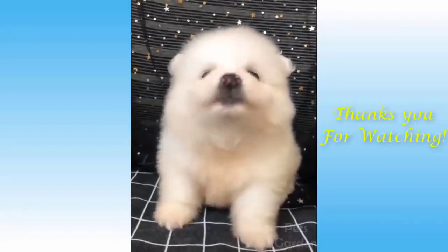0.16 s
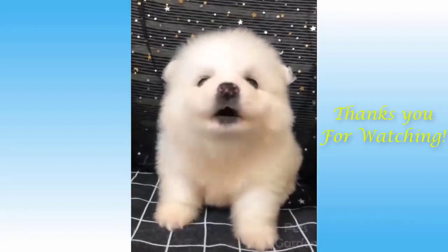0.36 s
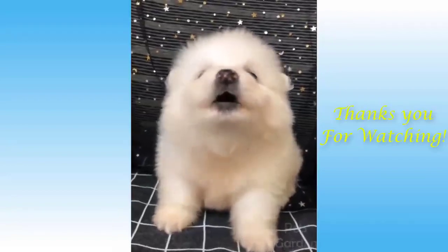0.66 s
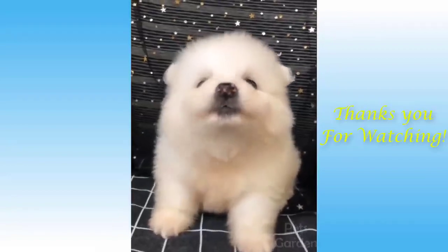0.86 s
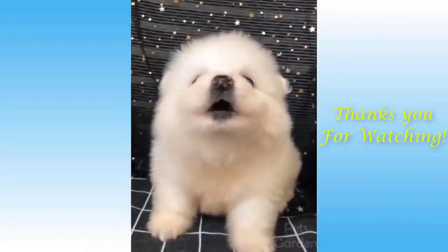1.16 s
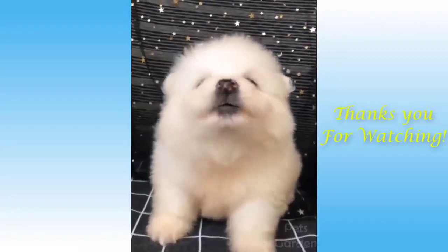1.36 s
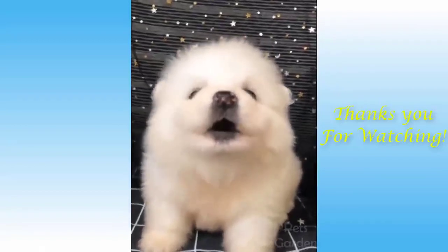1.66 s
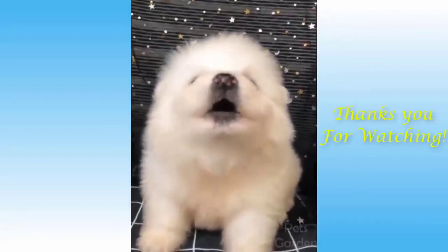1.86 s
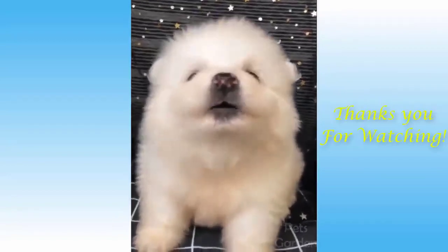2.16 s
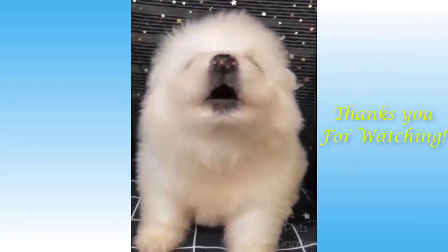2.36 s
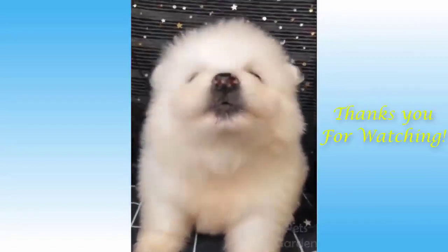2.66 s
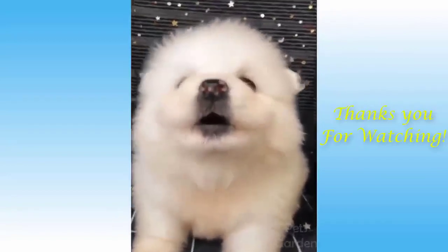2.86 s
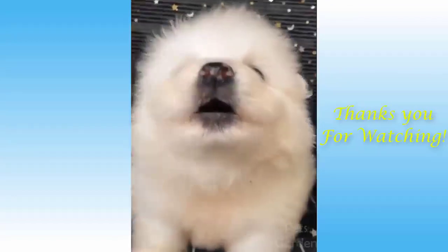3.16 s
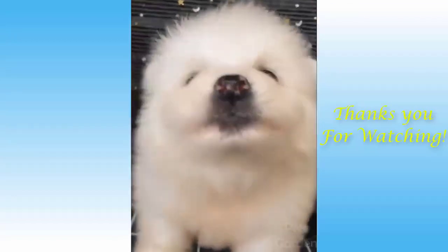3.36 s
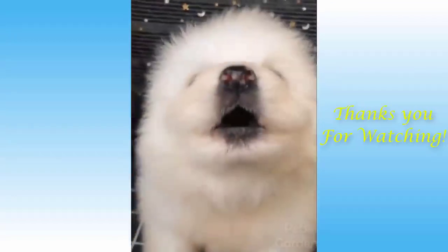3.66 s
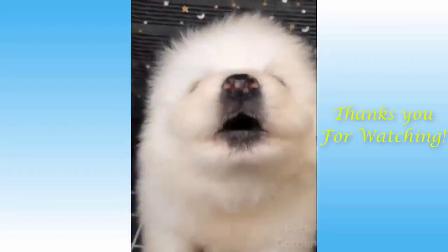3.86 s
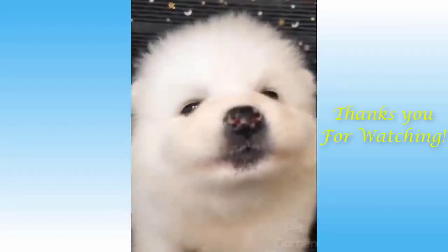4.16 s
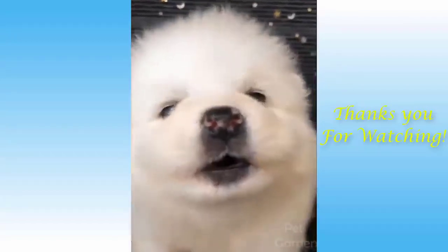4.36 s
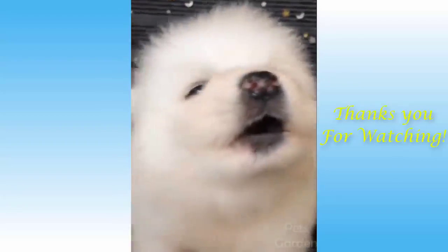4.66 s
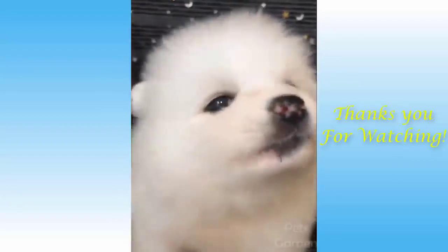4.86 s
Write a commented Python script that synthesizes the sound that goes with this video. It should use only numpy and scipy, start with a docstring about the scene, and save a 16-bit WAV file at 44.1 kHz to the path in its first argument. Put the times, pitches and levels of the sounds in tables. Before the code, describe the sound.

A small puppy gives eight short, high, clear howls close by, each yelping upward at the end, with rattly in-breaths between them.

```python
"""A puppy howls eight short cries, close by in a quiet furnished room.
Each cry is a clean high stack of partials: most dip and rise as the mouth opens, then break at the end.
Clicks ringing the throat make the in-breaths rattle, with hiss and a low puff; narrow noise bands wheeze.
Late on, the voice flutters in quick throbs of tone. Dull echoes, shaped room noise and the wavering
harmonics of a far motor lie underneath."""
import sys
import numpy as np
from scipy import signal
from scipy.fft import rfft, irfft, next_fast_len
from scipy.io import wavfile
from scipy.ndimage import uniform_filter1d

SR = 44100
rng = np.random.default_rng(int(sys.argv[2]) if len(sys.argv) > 2 else 0)


def dump(signal):
    """Clip the signal to [-1, 1] and save it as 16-bit WAV at the path in sys.argv[1]."""
    limited = np.clip(np.atleast_2d(signal).T, -1, 1)
    pcm = np.round(limited * 32767).astype(np.int16)
    wavfile.write(sys.argv[1], SR, pcm)


N = 221105
CUTOFF_HZ = 16300

# path of each howl: time_s, pitch_hz, level_db, mouth_opening (0-1), upper_mouth_hz, upper_partials_db
HOWLS = [
    [(0.0, 900, -17, 0.73, 3450, -45), (0.012, 927.5, -14.5, 1.0, 3490, -46.5),
     (0.064, 920, -12.9, 1.0, 3475, -46.5), (0.104, 907, -15.5, 0.99, 3457, -46),
     (0.14, 884.6, -20, 0.86, 3410, -52), (0.164, 873, -23.5, 0.65, 3320, -58),
     (0.172, 885, -21.5, 0.8, 3330.0, -58.0)],
    [(0.398, 771, -42.5, 0.39, 3640.0, -71.0), (0.43, 746, -43, 0.03, 4020, -63),
     (0.466, 628, -37, 0.3, 3700, -71), (0.518, 595, -38, 0.26, 3570.0, -61),
     (0.566, 627, -29.5, 0.5, 3750, -52), (0.586, 658, -26.9, 0.6, 3680, -45),
     (0.598, 661, -25, 0.8, 3160, -47.5), (0.634, 712.4, -22.5, 0.98, 3500, -47),
     (0.666, 813, -23, 0.87, 3600, -52), (0.698, 889, -20, 0.71, 3920, -52.5),
     (0.726, 940.4, -15.5, 1.0, 3500.0, -50), (0.774, 933.7, -13.5, 1.0, 3530, -45.0),
     (0.802, 920.4, -13.4, 1.0, 3530, -44.5), (0.846, 877, -20, 0.86, 3345, -56),
     (0.878, 855, -24.5, 0.72, 3200, -62)],
    [(1.101, 745, -43, 0.46, 3600, -62), (1.105, 678, -40.5, 0.44, 3610.0, -68),
     (1.145, 725, -41.5, 0.23, 4100, -62), (1.173, 639, -35.5, 0.33, 3730, -70),
     (1.189, 624, -34.5, 0.38, 3660, -61), (1.229, 618, -32.5, 0.4, 3680, -58),
     (1.277, 689, -27.5, 0.78, 3100, -42.5), (1.309, 728.5, -22.5, 0.99, 3624, -50),
     (1.345, 759, -22, 0.98, 3610, -47.5), (1.378, 814, -21.5, 0.81, 3480, -55),
     (1.404, 867.6, -20, 0.78, 3550, -54), (1.437, 841, -17.5, 0.98, 3230, -55),
     (1.486, 801, -23.5, 0.91, 2980, -69)],
    [(1.696, 897, -33, 0.37, 3080.0, -67.0), (1.704, 830, -36, 0.42, 3100, -56),
     (1.736, 927, -25.5, 0.37, 3330, -50.0), (1.768, 744, -35.5, 0.55, 4070, -56),
     (1.796, 750, -34.5, 0.52, 4100, -51.5), (1.828, 674.5, -26, 0.79, 3180, -46),
     (1.9, 751, -24, 0.93, 3600, -54), (1.94, 879, -19.5, 0.67, 3680, -52),
     (1.972, 969.6, -14, 0.97, 3560, -35), (2.024, 948, -15.0, 0.94, 3570, -39.5),
     (2.071, 937, -21, 0.85, 3430, -51.5), (2.1, 973, -22.5, 0.69, 3430.0, -47.5)],
    [(2.344, 1039, -26.8, 0, 3540, -58), (2.36, 1025, -23, 0, 3730, -56.0),
     (2.384, 1016, -23, 0.39, 3650, -54), (2.415, 901, -25, 0.33, 3580.0, -56),
     (2.448, 798, -29, 0.29, 3580, -51.5), (2.488, 768.5, -28, 0.7, 3800, -44.5),
     (2.52, 838, -19.5, 0.82, 3460, -49), (2.56, 891.0, -18.0, 0.67, 3800, -48),
     (2.58, 902, -15, 0.83, 3240, -51), (2.616, 893, -16.5, 0.79, 3280, -48.0),
     (2.664, 923, -21.2, 0.65, 3280, -63), (2.7, 947, -22.5, 0.65, 3150.0, -68)],
    [(2.932, 1021, -28.5, 0.0, 3150.0, -61), (2.964, 1020, -26, 0.0, 3340, -58),
     (3.016, 962, -25.8, 0.07, 3330.0, -52.5), (3.04, 849.0, -25.3, 0.12, 3500.0, -50),
     (3.06, 762, -30.5, 0.28, 3360.0, -55.5), (3.092, 754, -27.5, 0.68, 3300, -57.0),
     (3.108, 783, -23.5, 0.78, 3360.0, -55.5), (3.128, 812, -21.5, 0.71, 3530, -58),
     (3.16, 870, -18.5, 0.59, 3690, -46), (3.212, 903, -15, 0.77, 3190, -51),
     (3.29, 937, -21, 0.65, 3210, -60.5), (3.338, 948, -24, 0.55, 3160, -66.0)],
    [(3.571, 859, -27, 0.0, 3220.0, -68.0), (3.595, 894.0, -26, 0.0, 3330.0, -63),
     (3.615, 926, -23.5, 0.08, 3430.0, -56.0), (3.627, 882, -23.5, 0.0, 3280, -52.5),
     (3.679, 693.5, -32, 0.24, 3220.0, -54.5), (3.731, 696.6, -28, 0.35, 3150.0, -52),
     (3.755, 703.6, -23, 0.7, 3230, -49.0), (3.819, 778, -19.5, 0.79, 3250, -56),
     (3.875, 880, -14.0, 0.74, 3170, -44.5), (3.93, 904, -15.5, 0.68, 3230, -52),
     (3.959, 913, -17.5, 0.66, 3230, -58), (3.982, 963, -18.5, 0.63, 3360.0, -51)],
    [(4.317, 833, -28.5, 0.0, 3430.0, -69.0), (4.325, 798, -32.5, 0, 3400, -65.0),
     (4.361, 844, -24.5, 0, 3360, -56), (4.409, 730, -30.5, 0.07, 3330.0, -59.5),
     (4.461, 678, -30.5, 0.27, 3180.0, -54), (4.505, 691.4, -28, 0.26, 3170, -49),
     (4.565, 736.3, -23, 0.67, 3160, -49.5), (4.62, 766.3, -19.5, 0.69, 3310, -45),
     (4.653, 792, -18.9, 0.76, 3310, -52.5), (4.705, 879, -14.5, 0.63, 3690, -44.5),
     (4.729, 864.0, -15.0, 0.65, 3610.0, -43), (4.821, 884, -12, 0.72, 3415, -45.5),
     (4.877, 849.7, -15, 0.74, 3320, -52), (4.91, 828, -18.5, 0.74, 3330.0, -52)],
]
# the break ending each howl, a swell, a flip, a step to a second note, a drop:
# top_s, top_hz, top_db, hold_s, second_note_hz, second_note_db, second_note_s, overtones_db, swell_db
BREAKS = [(.187, 1132, -26.5, .001, 1030, -31.5, 0.00084, -39.5, 3.5),
          (.894, 1070, -25.5, 0.0021, 970, -31.5, 0.00076, -40, 7.5),
          (1.503, 1000, -26.5, 0.00082, 930, -34, 0.00081, -38, 6.5),
          (2.116, 1336, -9.5, 0.022, 1054, -26.5, 0.0012, -35, 1),
          (2.719, 1295, -12.5, 0.013, 1006, -25.5, 0.0016, -36, -3),
          (3.354, 1307, -13, 0.0025, 1065, -21.5, .017, -32.5, 6),
          (3.991, 1036, -23, 0.0014, 1111, -21, 0.12, -35, -4),
          (4.929, 960, -22, 0.00081, 980, -22, .011, -36, -3.5)]
# colour of the first five partials, mouth nearly shut and wide open: frequency_hz, level_db
SHUT_COLOUR = [(580.0, -2.5), (750.0, -2.3), (950.0, 2.5), (1250.0, -13.5), (1500.0, -17.5),
               (1800.0, -10.5), (2100.0, -19), (2400.0, -43.5), (2750.0, -55), (3100.0, -46),
               (3500.0, -52.5), (3800.0, -48.5), (4200.0, -43), (4700.0, -33.5), (5300.0, -52.5)]
OPEN_COLOUR = [(580.0, -9.5), (750.0, -0.3), (950.0, 0.5), (1250.0, 10.5), (1500.0, 12), (1800.0, 19.5),
               (2100.0, 12), (2400.0, 14.5), (2750.0, -6.5), (3100.0, 9.5), (3500.0, 12.5), (3800.0, -8.5),
               (4200.0, -26), (4700.0, -21.5), (5300.0, -43.5)]
COLOUR_AT_HZ = 3500   # upper mouth resonance at which both colours hold
# extra loss of partials 1 to 5 per dB the howl sinks below its loudest so far: loss_db_per_db
TIRING = (0.0, 0.065, 0.59, 0.14, 1.0)
# colour of the overtones in a break: frequency_hz, level_db
BREAK_COLOUR = [(1600, 3), (2050, 0.5), (2600, -8), (2950, -10.5), (3250, -1), (3650, -15), (4200, -26.5),
                (5000, -35.5)]
# mouth colour of the partials from the sixth up: frequency_hz, level_db
UPPER_COLOUR = [(2290, -40.5), (3900, -3.5), (4710, -20), (5620, -17), (6480, -1.5), (7000, -1.5),
                (7780, -3), (8810, -24), (9980, -20), (11000, -36.5), (11800, -28), (15000, -34),
                (16000, -78.5)]
# colour of the rough partials: frequency_hz, level_db
RASP_COLOUR = [(3900, -21.5), (4700, -11.5), (5500, -15.5), (6300, -5), (7300, -5.5), (8500, -7),
               (10000, -23.5)]
# colour of the topmost partials: frequency_hz, level_db
SHEEN_COLOUR = [(8500, -25.5), (9500, 1), (10700, -9.5), (12000, -2), (13000, -8), (13900, 1), (15200, -11)]
# bands of air hissing at the lips: frequency_hz, width_hz, level_db
LIP_BANDS = [(9200, 630, 4), (12400, 1000, -2.5), (13900, 1700, -5), (14900, 400, -3)]
# levels for a howl at 0 dB, and the share of the howl's level swing they follow
RASP_DB, RASP_FOLLOWS = -53, 0.34
HISS_DB, HISS_FOLLOWS = -54.0, 0.6
HISS_OPEN_DB, BREAK_HISS_DB = 6.0, 5.5   # more hiss with the mouth wide open, more air in a break
# from about this pitch (lower once the flip begins) the folds lock to the throat and the overtones tear
TEAR_HZ = 1183
# timing of a break, then the pitch ratio and level gained before the flip's fast last part
SWELL_S, FLIP_S, FLIP_LAST_S, EARLY_RATIO, EARLY_DB = 0.0051, 0.012, .004, 1.1, 5.5
HOLD_SAG_DB_PER_S, STEP_S, UNDERSHOOT = 394.5, 0.0038, 0.94   # the second note starts flat and climbs
DROP_S, DROP_RATIO, DROP_DB, FADE_S, FADE_DB = .006, 0.792, -3.5, .005, -20
BREAK_TOP_DB = -61.5   # upper partials in a break

# colour of the room noise: frequency_hz, relative_level_db_per_hz
ROOM_COLOUR = [(24, -37), (40, 0.5), (269, -4), (412, -7.5), (542, -8.5), (790, -9.5), (1180, -7.5),
               (1410, -10), (2150, -16.5), (3650, -22.5), (4030, -24), (6330, -25.5), (14500, -29.5),
               (16000, -46)]
ROOM_DB, ROOM_T60_S, ECHO_DB = -55.5, 0.23, -30
WALL_CUT_HZ = 3600   # here the reverb time has shrunk by a factor of 1.4
# harmonics of the motor: frequency_hz, mean_level_db
HUM_HARMONICS = [(88.5, -65.5), (177, -63.5), (265, -64.5), (354, -67.5)]

# rattle clicks of each in-breath: start_s, strike_db
RATTLES = [
    [(.2471, -28.5), (.2846, -34)],
    [(.9522, -31), (.9727, -36), (.9914, -34)],
    [(1.5548, -24.5), (1.5661, -28), (1.5846, -24), (1.5972, -31)],
    [(2.1932, -24.5), (2.202, -25.5), (2.2114, -30), (2.2209, -20.5), (2.2334, -21.5)],
    [(2.79, -24), (2.8153, -27), (2.82, -29), (2.8305, -28)],
    [(3.4326, -24), (3.4368, -24), (3.4466, -36), (3.4544, -17.5), (3.4676, -22)],
    [(4.1755, -21.5), (4.1886, -22), (4.1975, -18.5), (4.2101, -17)],
]
RATTLE_HZ, RATTLE_RISE_HZ_PER_S = 3840, 13000   # the mouth resonance climbs through each breath
FAINT_RATTLE_DB, FAINT_SPAN_S = -37.5, .055   # two weak clicks fall anywhere in this span
# air drawn in around the cries: centre_s, length_s, hiss_db, puff_db
INBREATHS = [(0.28, 0.19, -60, -51.5), (0.976, 0.091, -69, -53), (1.58, 0.044, -48, -55),
             (2.215, 0.07, -53, -46.5), (2.816, 0.15, -56.5, -56), (3.458, 0.04, -48.5, -46),
             (4.202, 0.05, -48, -42.5), (4.965, 0.049, -47, -67)]
# throat resonances before widening: frequency_hz, width_hz, level_db
THROAT = [(1310, 110, 2), (1907, 240, -3.5), (7330, 600, -17), (9300, 250, -17.5), (11530, 400, -21.5),
          (13700, 300, -16)]
# resonance that moves with the jaw, width before widening: mean_hz, width_hz, level_db
MOUTH = (3740, 225, -6.5)
# ticks as the folds close or the lips part: start_s, strike_db, mouth_hz
TICKS = [(.394, -39, 4000), (1.097, -30.5, 4830), (1.692, -33, 4570), (2.339, -34, 4500),
         (2.926, -44, 4570), (3.079, -41.5, 3000), (3.565, -38, 4540), (3.742, -27.5, 3000),
         (4.312, -54, 4370), (4.541, -25, 3000)]
# air rasping through the nearly shut mouth: centre_s, length_s, frequency_hz, width_hz, level_db
WHEEZES = [(.43, 0.08, 4530, 220, -62), (1.21, 0.12, 4920, 150, -59), (1.778, 0.24, 4660, 500, -52),
           (1.78, .16, 7700, 900, -57), (2.409, 0.082, 4830, 500, -52.5), (2.422, 0.14, 6960, 900, -56),
           (2.98, 0.11, 6050, 500, -57.5)]

# mouth resonances rung in each throb: frequency_hz, width_hz, level_db
THROB_RINGS = [(1700, 500, -27.5), (2680, 570, -25), (3636, 500, -49)]
THROB_START_S, THROBS_PER_S, THROB_COUNT, THROB_HZ, THROB_DB = 3.993, 120.3, 11, 1307, -7
THROB_FILL = 1.09   # length of a throb over their spacing
THROB_JITTER_S, THROB_SPREAD_DB, THROB_SPREAD_HZ = .0007, 0.95, 45


def amp(db):
    """Turn dB into gain."""
    return 10 ** (np.asarray(db) / 20)


def rms_one(x):
    """Scale to rms 1."""
    return x / np.sqrt(np.mean(x ** 2) + 1e-20)


def at_hz(points, hz):
    """Read a spectrum on a log-frequency axis."""
    points = np.array(points)
    return np.interp(np.log(hz), np.log(points[:, 0]), points[:, 1])


def drift(rate_hz):
    """Random wander, noise through two equal low-pass poles, rms 1."""
    r = np.exp(-2 * np.pi * rate_hz / SR)
    wander = signal.lfilter([1], [1, -2 * r, r * r], rng.standard_normal(N + 20000))
    return rms_one(wander[20000:])   # skip the filter's start


def resonance(x, hz, width_hz):
    """Two-pole band with gain 1 on top."""
    r = np.exp(-np.pi * width_hz / SR)
    poles = [1, -2 * r * np.cos(2 * np.pi * hz / SR), r * r]
    return signal.lfilter([(1 - r * r) / 2, 0, (r * r - 1) / 2], poles, x + 1e-18)


def noise_band(air, hz, width_hz):
    """Air through the same resonance twice, for steeper skirts."""
    return resonance(resonance(air, hz, width_hz), hz, width_hz)


def swell(centre_s, length_s):
    """A smooth hump in time, height 1."""
    return np.cos(np.pi * np.clip((np.arange(N) / SR - centre_s) / length_s, -.5, .5)) ** 2


def howl(rows, t):
    """Pitch and levels of a held cry: the first five partials slide through the colour of the mouth."""
    hz, level_db, opening, mouth_hz, top_db = [np.interp(t, rows[:, 0], c) for c in rows.T[1:]]
    # from the third partial up, the colour shifts with the upper mouth resonance
    read_hz = [k * hz * (COLOUR_AT_HZ / mouth_hz if k > 2 else 1) for k in range(1, 6)]
    colour = np.array([(1 - opening) * at_hz(SHUT_COLOUR, f) + opening * at_hz(OPEN_COLOUR, f)
                       for f in read_hz])
    colour -= np.outer(TIRING, np.maximum.accumulate(level_db) - level_db)
    # the five partials together carry the howl's level
    low_db = level_db + colour - 10 * np.log10(np.sum(amp(colour) ** 2, axis=0))
    smooth_hz = uniform_filter1d(hz, size=450, mode="nearest")   # the held voice bends smoothly
    rasp_db = RASP_DB + RASP_FOLLOWS * level_db
    hiss_db = HISS_DB + HISS_FOLLOWS * level_db + HISS_OPEN_DB * opening
    return np.vstack([smooth_hz, low_db, top_db, rasp_db, hiss_db])


def flip(last, t, top_s, top_hz, top_db, hold_s, low_hz, low_db, length_s, over_db, swell_db):
    """A voice break starting from the last held values: corner times, and the same columns as a howl."""
    steps_s = [-FLIP_S - SWELL_S, SWELL_S, FLIP_S - FLIP_LAST_S, FLIP_LAST_S,
               hold_s / 2, hold_s / 2, STEP_S, length_s, DROP_S, FADE_S]
    corners = top_s + np.cumsum(steps_s)
    held_hz, held_db = last[:2]
    sag_db, dropped_hz = HOLD_SAG_DB_PER_S * hold_s, DROP_RATIO * low_hz
    hz = np.interp(t, corners, [held_hz, held_hz, min(EARLY_RATIO * held_hz, top_hz), top_hz, top_hz,
                                top_hz, UNDERSHOOT * low_hz, low_hz, dropped_hz, dropped_hz])
    first_db = np.interp(t, corners, [held_db, held_db, held_db + EARLY_DB, top_db, top_db - sag_db / 5,
                                      top_db - sag_db, low_db, low_db, low_db + DROP_DB, low_db + FADE_DB])
    broken = np.interp(t, corners[1:3], [0, 1])   # crossfade from held to broken colour
    fading_db = np.interp(t, corners[-3:], [0, 3 * DROP_DB, FADE_DB])
    swollen_db = np.interp(t, corners[:2], [0, swell_db])
    over = []
    for k, held in enumerate(last[2:6], 2):
        break_db = over_db + at_hz(BREAK_COLOUR, k * hz) + fading_db
        over.append((1 - broken) * (held + swollen_db) + broken * break_db)
    upper_db = (1 - broken) * last[6] + broken * BREAK_TOP_DB
    rasp_db = last[7] + 0 * t
    return corners, np.array([hz, first_db, *over, upper_db, rasp_db, last[8] + BREAK_HISS_DB * broken])


def stack(phase, hz, spectrum, levels):
    """Partials from the sixth up slide through a fixed spectrum at rms 1, then levels move them."""
    gains = [amp(at_hz(spectrum, k * hz)) * (k * hz < CUTOFF_HZ) for k in range(6, 24)]
    lines = sum(g * levels[k % len(levels)] * np.sin(k * phase + k * k) for k, g in enumerate(gains, 6))
    return lines / np.sqrt(sum(g ** 2 for g in gains) / 2)


def voice(jitter=0.005, waver=.003, shimmer_db=0.33, patchy_db=3.5, attack_s=.006, release_s=0.0069):
    """Regular vocal fold cycles as a harmonic stack, partly rough on top, with air hissing at the lips."""
    t, out = np.arange(N) / SR, np.zeros(N)
    wobble = 1 + jitter * drift(28) + waver * drift(13)
    shimmer, rough = amp(shimmer_db * drift(44)), drift(260)
    white = rng.standard_normal(N)
    hiss = rms_one(sum(amp(db + 1.9 * drift(12)) * noise_band(white, hz, width)
                       for hz, width, db in LIP_BANDS))
    # the upper partials waver slowly in level, in five independent groups
    patches = [amp(patchy_db * drift(8.5)) for _ in range(5)]
    # uneven cycles smear each upper partial into a band
    grains = [drift(220) for _ in range(4)]
    fine = [drift(60) for _ in range(4)]
    for rows, end in zip(map(np.array, HOWLS), BREAKS):
        start_s = rows[0, 0]
        end_s = end[0] + end[3] + end[6] + STEP_S + DROP_S + FADE_S
        on = slice(max(int((start_s - attack_s) * SR), 0), int(end_s * SR))
        now = t[on]
        held = howl(rows, now)
        last = held[:, np.searchsorted(now, end[0] - FLIP_S - SWELL_S)]
        corners, broken = flip(last, now, *end)
        hz, *low_db, top_db, rasp_db, hiss_db = np.where(now < corners[0], held, broken)
        phase = 2 * np.pi * np.cumsum(hz * wobble[on]) / SR
        first, *over = [amp(db) * np.sqrt(2) * np.sin(k * phase - k) for k, db in enumerate(low_db, 1)]
        top = amp(top_db) * stack(phase, hz, UPPER_COLOUR, [p[on] for p in patches])
        rasp = amp(rasp_db) * stack(phase, hz, RASP_COLOUR, [g[on] for g in grains])
        sheen = stack(phase, hz, SHEEN_COLOUR, [g[on] for g in fine])
        lips = amp(hiss_db) * (0.99 * sheen + 0.69 * hiss[on])
        # the overtones turn rough at high pitch, from a lower pitch once the flip begins
        torn = np.clip(.08 + .45 * (now > corners[1]) + (hz - TEAR_HZ) / 150, 0, 1)
        overtones = (shimmer[on] * (1 - torn) + torn * rough[on]) * (sum(over) + top)
        attack = np.clip(1 + (now - start_s) / attack_s, 0, 1) ** 2
        release = np.clip((corners[-1] - now) / release_s, 0, 1)
        out[on] = attack * (shimmer[on] * first + overtones + release * (rasp + lips))
    return out


def echoes(x):
    """Room reflections from sixteen feedback delays, duller on every round."""
    size = next_fast_len(N + SR)
    hz = np.fft.rfftfreq(size, 1 / SR)
    t60 = ROOM_T60_S / np.sqrt(1 + (hz / WALL_CUT_HZ) ** 2)
    lags_s = rng.uniform(0.012, .045, size=16)
    loops = [amp(-60 * lag / t60) * np.exp(-2j * np.pi * hz * lag) for lag in lags_s]
    response = sum((-1) ** k * g / (1 - g) for k, g in enumerate(loops))
    return irfft(rfft(x, size) * response, size)[:N]


def room_noise():
    """Steady random air noise shaped by the room's spectrum."""
    hz = np.fft.rfftfreq(N, 1 / SR) + 1
    shaped = irfft(rfft(rng.standard_normal(N)) * amp(at_hz(ROOM_COLOUR, hz)), N)
    return amp(ROOM_DB) * rms_one(shaped)


def quieter_upper_room(room, loud, depth_db=2.5, split_hz=2400.0):
    """The room noise and echoes above the split are lower while the puppy is loud."""
    level_db = 10 * np.log10(uniform_filter1d(loud ** 2, size=1500) + 1e-12)
    upper = signal.sosfilt(signal.butter(2, split_hz, "high", fs=SR, output="sos"), room)
    lower = signal.sosfilt(signal.butter(2, split_hz, "low", fs=SR, output="sos"), room)
    cut_db = depth_db * np.clip((level_db + 30.0) / 20.0, 0, 1)
    return lower - upper * amp(-cut_db)   # the minus keeps the bands in phase at the split


def hum(waver_db=4.0, slip_rad=0.66):
    """Harmonics of a far motor, wavering in level and phase."""
    t, out = np.arange(N) / SR, np.zeros(N)
    for hz, db in HUM_HARMONICS:
        level = amp(db + waver_db * drift(7.8)) * np.sqrt(2)
        out += level * np.sin(2 * np.pi * hz * t + slip_rad * drift(2.0))
    return out


def throat(x, widen, mouth_hz):
    """The throat and mouth resonances ring in parallel."""
    rings = sum((-1) ** k * amp(db) * resonance(x, hz, widen * width)
                for k, (hz, width, db) in enumerate(THROAT))
    return rings + amp(MOUTH[2]) * resonance(x, mouth_hz, widen * MOUTH[1])


def snaps(events, ring_db, crack_db, spray_db, spray_s):
    """Clicks with a dying spray of air behind them ring the throat; each has a short crack."""
    out, t = np.zeros(N), np.arange(2000) / SR
    for (s, db, mouth_hz), air in zip(events, rng.standard_normal((len(events), 2000))):
        blow = (t == 0) + amp(spray_db) * air * np.exp(-t / spray_s)
        ring = amp(ring_db) * throat(blow, 0.93, mouth_hz)
        crack = amp(crack_db) * np.diff(blow, prepend=0)
        at = round(s * SR)
        out[at:at + 2000] += amp(db) * (ring + crack)
    return out


def inbreath(puff_hz=246.0):
    """Soft tissue snaps in the stream of air; hiss and a low puff go with it."""
    hiss = rms_one(throat(rng.standard_normal(N), widen=11.0, mouth_hz=MOUTH[0]))
    puff = rms_one(resonance(rng.standard_normal(N), puff_hz, 110))
    air = sum(swell(s, length) * (amp(hiss_db) * hiss + amp(puff_db) * puff)
              for s, length, hiss_db, puff_db in INBREATHS)
    rattles = []
    for loud, chance in zip(RATTLES, rng.random((len(RATTLES), 2))):
        start = loud[0][0]
        faint = [(start + FAINT_SPAN_S * c, FAINT_RATTLE_DB) for c in chance]
        rattles += [(s, db, RATTLE_HZ + RATTLE_RISE_HZ_PER_S * (s - start)) for s, db in loud + faint]
    return snaps(rattles, ring_db=24.0, crack_db=-5.5, spray_db=-34.0, spray_s=0.0057) + air


def ticks():
    """Closing folds or parting lips click and ring the throat."""
    return snaps(TICKS, ring_db=25.5, crack_db=-11.0, spray_db=-22.5, spray_s=.002)


def wheezes():
    """Grainy air noise in narrow mouth resonances."""
    air = rng.standard_normal(N) * amp(4.2 * drift(110))
    return sum(amp(db) * swell(s, length) * rms_one(noise_band(air, hz, width))
               for s, length, hz, width, db in WHEEZES)


def flutter(folds_hz=1093.0, bend=0.045, second_db=-29.0, third_db=-23.0):
    """Throbs of tone on the throat resonance; fold overtones swell and bend in each, with rough air."""
    t, air = np.arange(N) / SR, rng.standard_normal(N)
    late, louder, higher = rng.standard_normal((THROB_COUNT, 3)).T
    s = THROB_START_S + np.arange(THROB_COUNT) / THROBS_PER_S + THROB_JITTER_S * late
    hz = THROB_HZ + THROB_SPREAD_HZ * higher
    peaks = amp(THROB_DB + THROB_SPREAD_DB * louder)
    shake = sum(peak * swell(at, THROB_FILL / THROBS_PER_S) ** .7 for at, peak in zip(s, peaks))
    tone = np.sin(2 * np.pi * np.cumsum(np.interp(t, s, hz)) / SR)
    rising = np.gradient(uniform_filter1d(shake, size=60))
    bent_hz = folds_hz * (1 + bend * rising / rising.max() + 0.022 * drift(60))
    folds = 2 * np.pi * np.cumsum(bent_hz) / SR
    overtones = amp(second_db) * np.sin(2 * folds) + amp(third_db) * np.sin(3 * folds)
    rings = sum(amp(db) * rms_one(noise_band(air, ring_hz, width)) for ring_hz, width, db in THROB_RINGS)
    return shake * (tone + overtones + rings)


def scene():
    """Puppy, its echoes, room noise and hum."""
    steady = 1 - .6 * swell(4.035, .1) ** .3   # the steady tone gives way while the throat flutters
    puppy = steady * voice() + inbreath() + ticks() + wheezes() + flutter()
    room = amp(ECHO_DB) * echoes(puppy) + room_noise()
    return (puppy + quieter_upper_room(room, puppy) + hum())[None]


def record(dry):
    """The deepest bass and the top are cut."""
    dry = signal.sosfilt(signal.butter(3, 36, "high", fs=SR, output="sos"), dry)
    return signal.sosfilt(signal.cheby2(12, 50, CUTOFF_HZ, fs=SR, output="sos"), dry)


dry = scene()
out = record(dry)
dump(out)
```